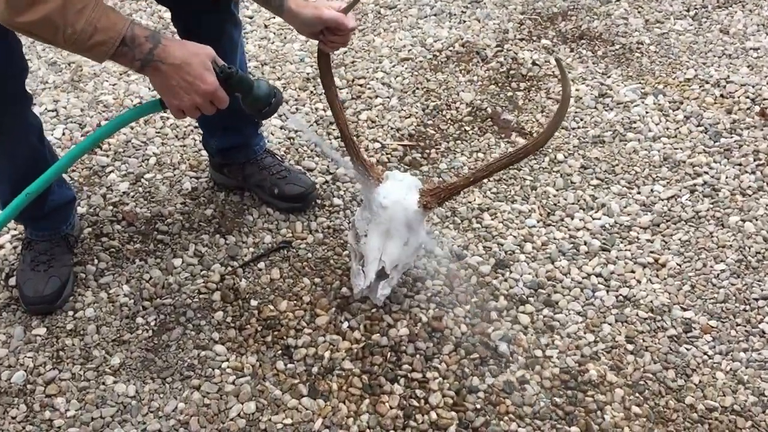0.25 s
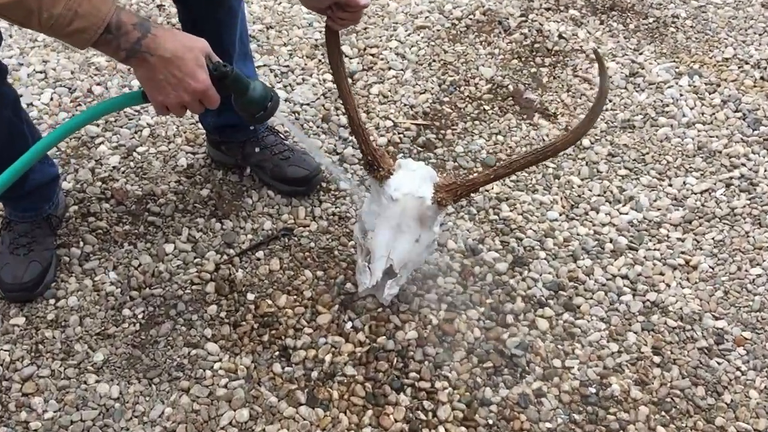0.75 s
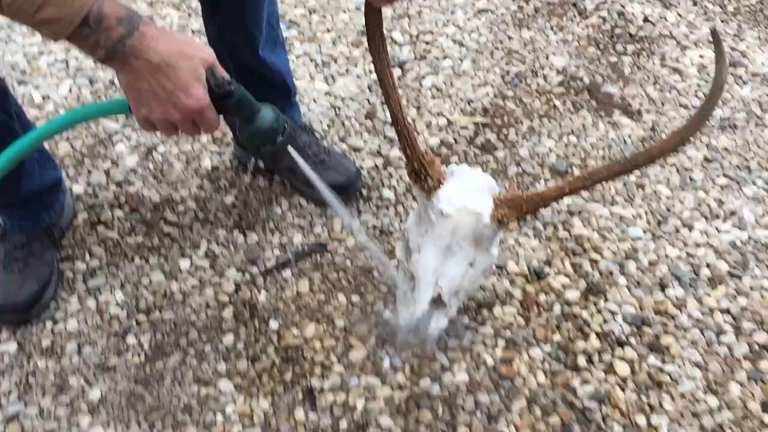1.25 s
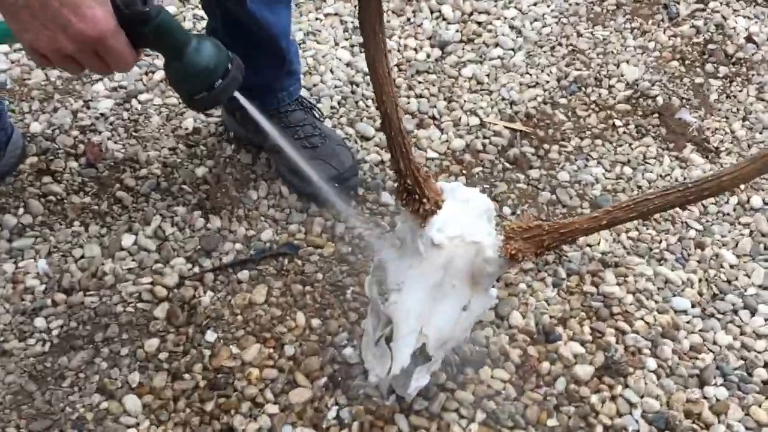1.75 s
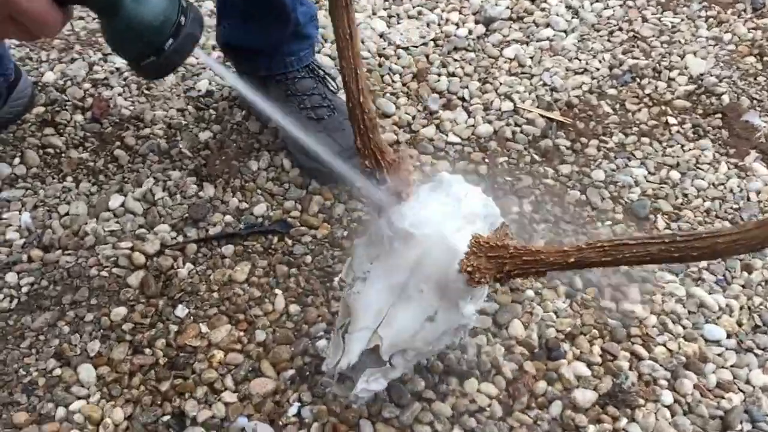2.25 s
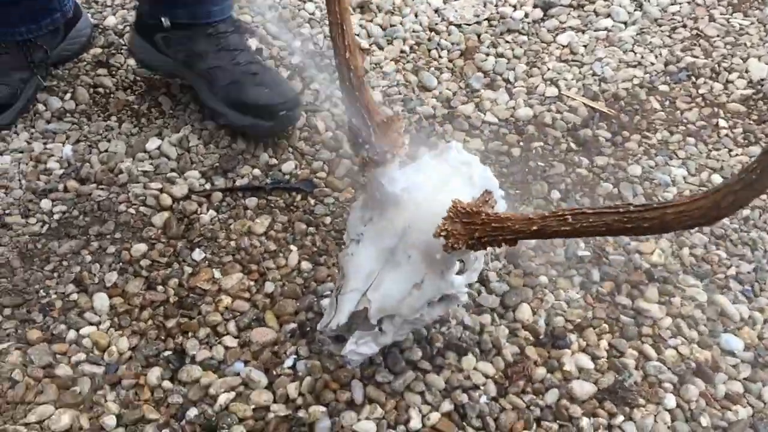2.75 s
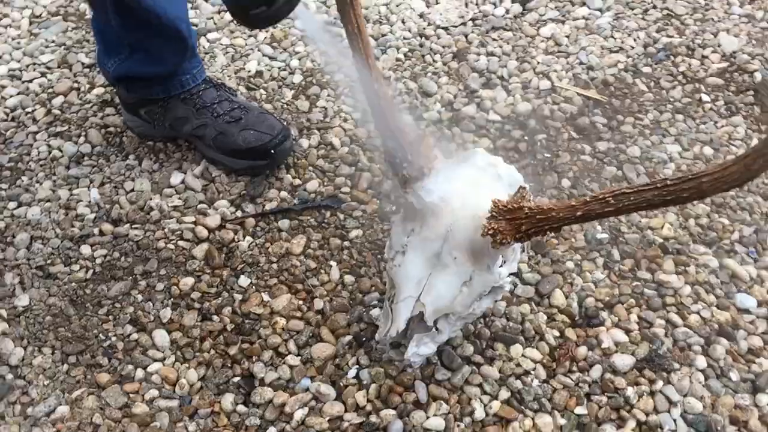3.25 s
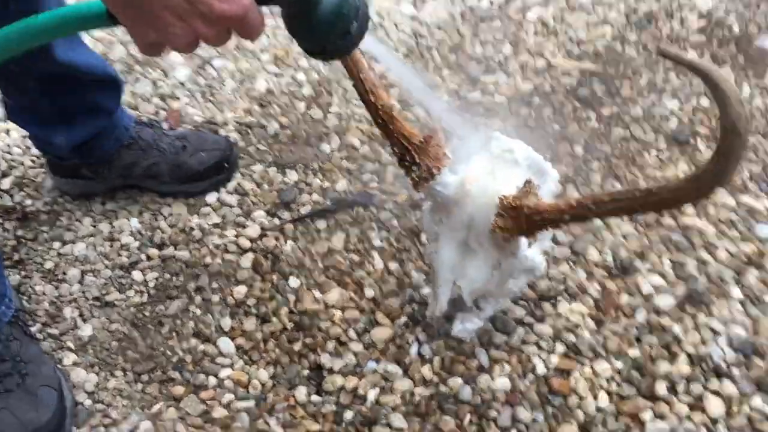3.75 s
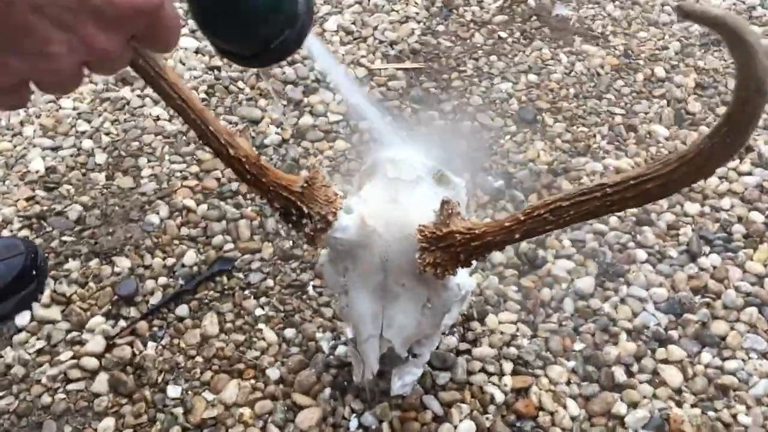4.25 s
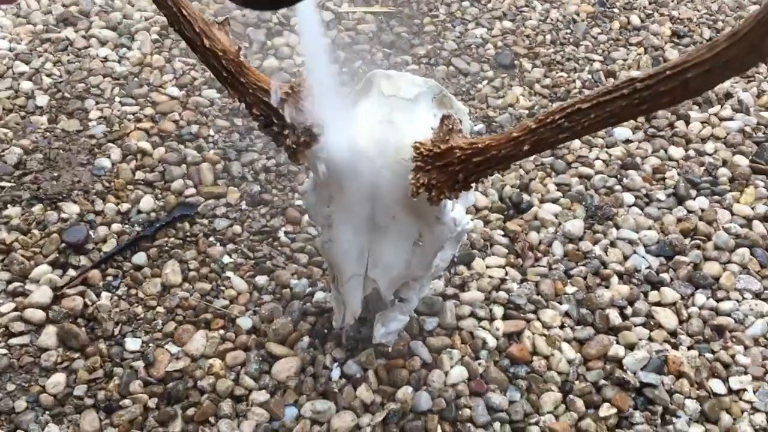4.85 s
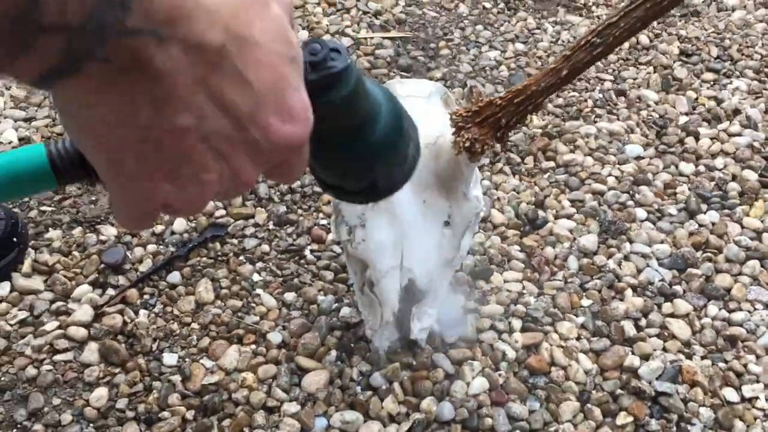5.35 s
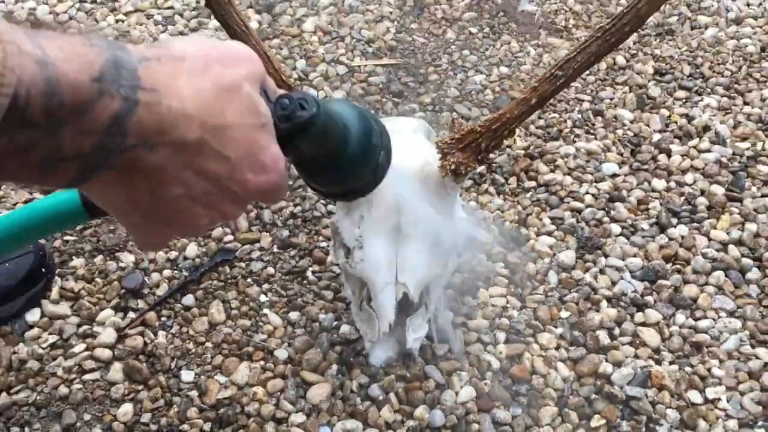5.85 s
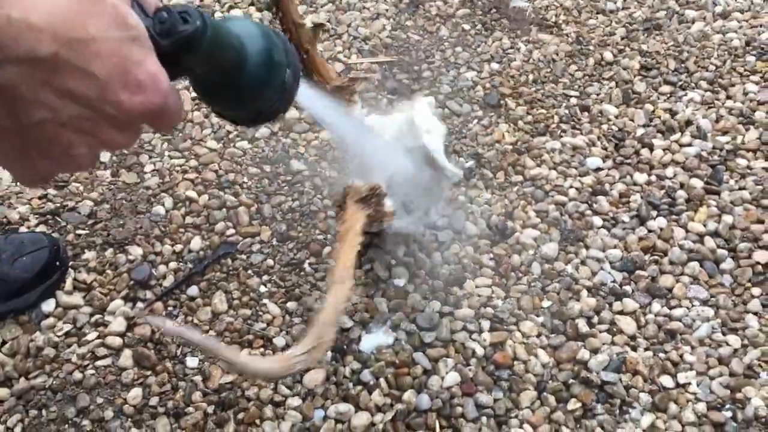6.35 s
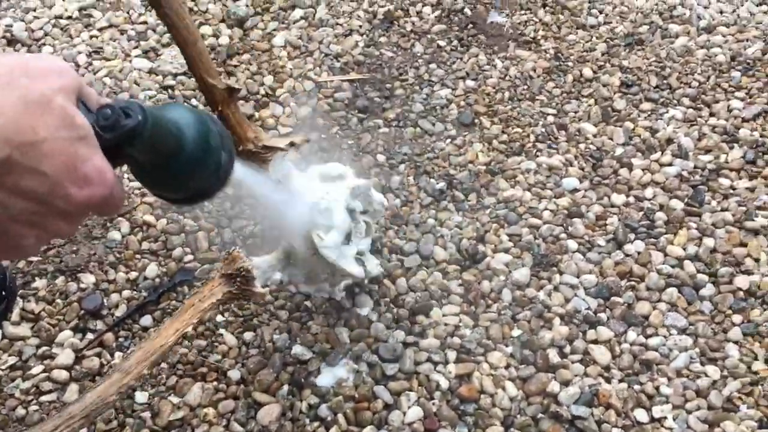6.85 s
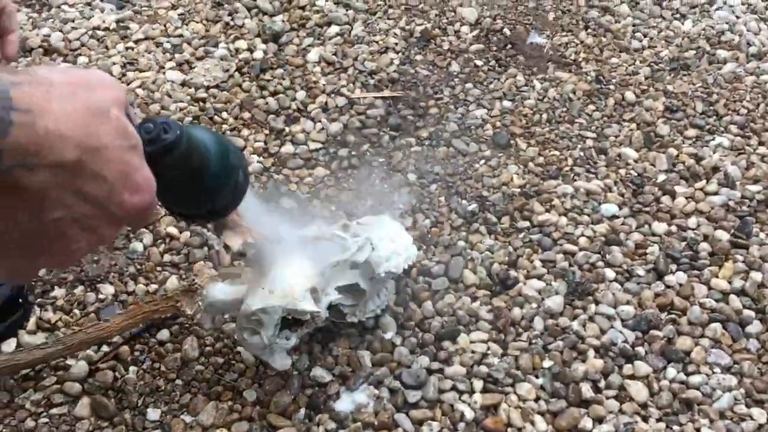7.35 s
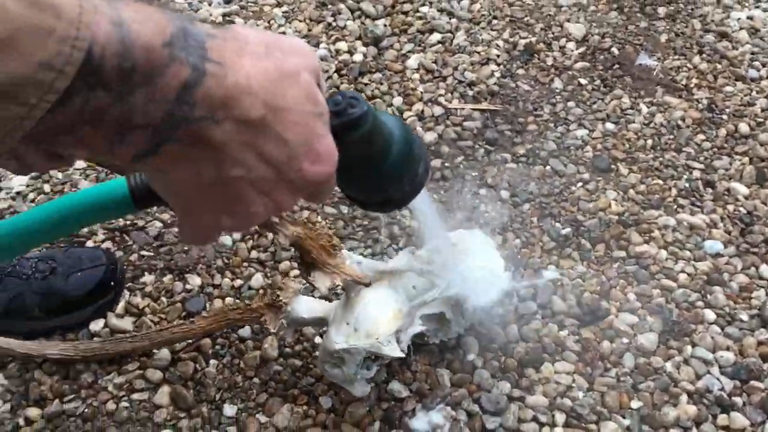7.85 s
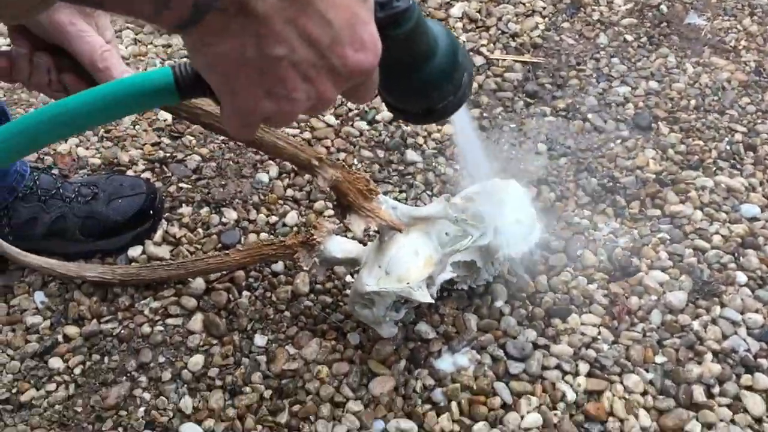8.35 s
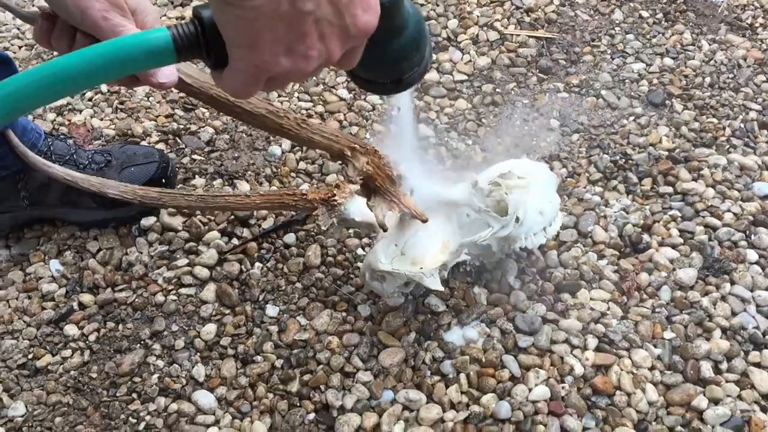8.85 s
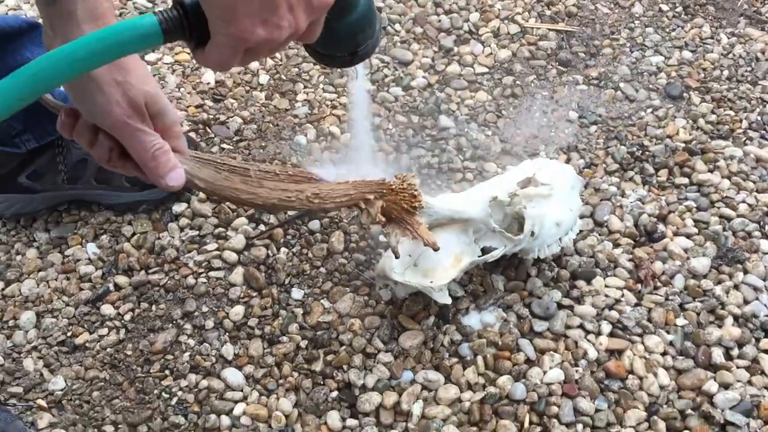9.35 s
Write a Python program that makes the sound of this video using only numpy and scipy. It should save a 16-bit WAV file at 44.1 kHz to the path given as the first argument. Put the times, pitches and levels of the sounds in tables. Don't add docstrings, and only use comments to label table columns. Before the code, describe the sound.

A steady, bright water spray wavers on stones and hollow bone. It starts moderate, with gulping spurts and dull knocks, swells into a series of harsh, ringing, comb-coloured roars, then drops back to close fine hiss and wet sputter. Wind buffets the small nearby microphone, most strongly past the middle. A faint engine rises briefly early on behind a dull traffic wash in an open gravel yard.

```python
import sys
import numpy as np
from scipy import signal
from scipy.fft import rfft, irfft
from scipy.io import wavfile

SR = 44100
rng = np.random.default_rng(int(sys.argv[2]) if len(sys.argv) > 2 else 0)


def elevation(decibels):
    levels = np.asarray(decibels, float)
    return 10 ** (levels / 20)


def generate_wav(signal):
    frames = np.transpose(np.atleast_2d(signal))
    scaled = np.clip(frames, -1, 1) * 32767
    pcm = np.round(scaled).astype(np.int16)
    wavfile.write(sys.argv[1], SR, pcm)


N = 423360
LIFTED_S = 3.9


def rms_one(x):
    return x / np.sqrt(np.mean(x ** 2) + 1e-20)


def in_time(rows, start=0, stop=N):
    s, *columns = np.transpose(rows)
    return [np.interp(np.arange(start, stop) / SR, s, c) for c in columns]


def curve(rows, start=0, stop=N):
    return in_time(rows, start, stop)[0]


def coloured(x, points):
    hz, db = np.transpose(points)
    grid = np.fft.rfftfreq(len(x), 1 / SR) + 1
    gain = elevation(np.interp(np.log(grid), np.log(hz), db))
    return rms_one(irfft(rfft(x) * gain, len(x)))


def cut(x, hz, kind, order=4):
    return signal.sosfilt(signal.butter(order, hz, kind, fs=SR, output="sos"), x)


def resonance(x, hz, width_hz):
    r = np.exp(-np.pi * width_hz / SR)
    poles = [1, -2 * r * np.cos(2 * np.pi * hz / SR), r * r]
    return signal.lfilter(np.array([1, 0, -1]) * (1 - r * r) / 2, poles, x)


def drift(rate):
    r = np.exp(-80 * np.pi * rate / SR)
    slow = signal.lfilter([1], [1, -2 * r, r * r], rng.standard_normal(N // 40 + 2002))[2000:]
    return np.interp(np.arange(N) / 40, np.arange(len(slow)), rms_one(slow))


def droplets(per_s, spread_db, burst_ms, share):
    struck = rng.random(N) < per_s / SR
    sizes = elevation(spread_db * np.minimum(rng.exponential(1, N), 2.1)) * struck
    bursts = signal.lfilter([1], [1, -np.exp(-1000 / (burst_ms * SR))], sizes)
    return rms_one(rng.standard_normal(N) + share * rms_one(bursts * rng.standard_normal(N)))


def puffs(rows, gain_db, rise_s, width):
    out, t = np.zeros(N + SR), np.arange(SR // 40) / SR
    for (s, db, hz), noise in zip(rows, rng.standard_normal((len(rows), len(t)))):
        puff = noise * t * np.exp(-t / rise_s)
        for _ in range(2):
            puff = resonance(puff, hz, width * hz)
        a = int(s * SR)
        out[a:a + len(t)] += elevation(db + gain_db) * puff / np.abs(puff).max()
    return out[:N]


# pitch_hz, level_db [dB per Hz]
TRAFFIC_COLOUR = [(18, -40), (30, -0.5), (86, -1.5), (165, -1.5), (564, -10), (788, -7.5), (1010, -13),
                  (1220, -4.5), (1480, -19.5), (2000, -17), (2600, -3), (4400, -120)]
# start_s, level_db
TRAFFIC_SWELL = [(0, -3), (.55, 0.5), (1.2, 2), (6.8, 4), (7.7, 2), (9.6, 3.5)]


def traffic():
    level_db = -44.5 + curve(TRAFFIC_SWELL) + 2.5 * drift(1.9)
    return elevation(level_db) * coloured(rng.standard_normal(N), TRAFFIC_COLOUR)


# start_s, speed [turns per s], level_db
ENGINE_SPEED = [
    (1.75, 46, -72),
    (1.9, 46.5, -47),
    (2.3, 48.5, -46),
    (2.7, 51, -46),
    (2.85, 52, -72),
]
# order [cycles per turn], level_db
ENGINE_HARMONICS = [
    (3, 0),
    (4, -6),
]


def engine():
    turns, level_db = in_time(ENGINE_SPEED)
    angle = 2 * np.pi * np.cumsum(turns) / SR
    tones = sum(elevation(db) * np.sin(order * angle) for order, db in ENGINE_HARMONICS)
    return elevation(level_db + 1.4 * drift(3.9)) * tones


# start_s, level_db
WIND_LEVEL = [(0, -45), (.64, -55), (.91, -66), (1.6, -46), (2.03, -65), (3.13, -63), (3.9, -51),
              (4.44, -54), (5.2, -50), (5.9, -43.5), (6.36, -32), (6.6, -48), (7.3, -50), (7.5, -40),
              (8.4, -51), (9.2, -46), (9.6, -50)]
# start_s, level_db [peak], pitch_hz
PORT_BUFFETS = [(0.033, -36, 124), (0.393, -32, 102), (0.946, -26, 87.5), (0.996, -23, 111),
                (1.062, -30, 80), (1.307, -29, 80.7), (1.37, -34, 109), (3.858, -29, 88.8),
                (5.707, -35, 72.7), (5.939, -19, 71), (6.052, -22, 77), (6.111, -27, 104),
                (6.178, -18, 107), (6.298, -22, 105), (6.348, -22, 72), (6.411, -22, 80.5),
                (6.482, -22.5, 107), (6.571, -24.5, 65), (6.839, -18.5, 63), (6.929, -28, 103),
                (7.057, -24, 96), (7.199, -25, 80.7), (7.289, -31, 59.5), (7.437, -32, 83.4),
                (7.54, -27, 119), (7.656, -17, 98), (7.814, -29, 75.4), (8.138, -29, 111), (8.598, -29, 76),
                (8.704, -27, 75.4)]


def wind():
    rumble = rms_one(cut(rng.standard_normal(N), [50, 140], "band", order=2))
    rumble *= elevation(curve(WIND_LEVEL) - 0.5 + 0.97 * drift(17.0))
    t = np.arange(SR // 8) / SR
    crack_hz, crack_s = 300, 0.0028
    for s, db, hz in PORT_BUFFETS:
        thump = np.sin(2 * np.pi * hz * (t - 2.0 * t ** 2)) * t / 0.0087 * np.exp(1 - t / 0.011)
        slap = elevation(-6) * np.sin(2 * np.pi * 210 * (t - 7.4 * t ** 2)) * t / 0.006 * np.exp(1 - t / 0.0077)
        crack = elevation(-19) * np.sin(2 * np.pi * crack_hz * t) * t / crack_s * np.exp(1 - t / crack_s)
        a = int(s * SR)
        rumble[a:a + len(t)] += elevation(db - 6.0) * (thump + slap + crack)[:N - a]
    return rumble


# start_s, level_db
CASE_TONE = [(0, -68), (2.1, -51), (2.3, -51), (2.7, -41), (3.6, -51), (3.85, -43), (4, -63), (4.3, -42),
             (4.5, -40), (4.7, -58), (4.9, -66), (9.6, -68)]


def singing():
    hz, width_hz = 1126, 110
    tone = resonance(resonance(rng.standard_normal(N), hz, width_hz), hz, 2 * width_hz)
    return elevation(curve(CASE_TONE)) * rms_one(tone)


# start_s, level_db [peak], pitch_hz
ROCKING = [(.951, -32, 260), (1.007, -36, 270), (1.327, -30, 300), (1.368, -29, 300), (1.396, -19, 300),
           (1.398, -33, 600), (1.712, -30, 280), (2.815, -24, 300), (3.865, -27.5, 334), (5.948, -28, 210),
           (6.84, -29, 230)]


def knocks():
    return puffs(ROCKING, gain_db=0, rise_s=0.0029, width=0.6)


# start_s, level_db [peak], pitch_hz
BIG_DROPS = [(1.2037, -9, 7550), (1.6018, -19, 5510), (1.8886, -13, 8260), (1.9485, -12, 5240),
             (2.3361, -6, 8340), (2.4544, -20, 7990), (2.4728, -13, 6500), (2.9811, -11, 5810),
             (4.4544, -10, 6550), (4.5236, -4, 3700), (4.8189, -16, 7830), (4.8319, -13, 7060),
             (6.155, -13, 6320), (6.4647, -11, 8020), (6.4752, -7, 8070), (6.9157, -11, 8170),
             (7.004, -10, 8420), (7.0204, -2, 8200), (7.0653, -12, 6330), (7.6395, -15, 4270),
             (7.8654, -8, 3990), (8.1748, -16, 7820), (8.373, -9, 5950), (9.05, -17, 4200),
             (9.2873, -22, 4300), (9.323, -14, 4220), (9.3666, -13, 8440)]


def smacks():
    return puffs(BIG_DROPS, gain_db=1.5, rise_s=0.00058, width=0.66)


# start_s, level_db [peak]
TINY_DROPS = [(2.4544, -14), (2.5494, -14), (2.564, -10), (2.6818, -10), (7.3088, -2), (7.6595, -9),
              (7.7244, -14), (8.9116, -5), (8.976, -4), (9.0389, -11), (9.3666, -13), (9.3804, -6),
              (9.4014, -10), (9.43, -6), (9.4454, -7), (9.523, -5)]


def ticks():
    rows = [(s, db, 10500) for s, db in TINY_DROPS]
    return puffs(rows, gain_db=1, rise_s=0.00033, width=1)


# start_s, level_db [peak], pitch_hz
HOLLOW_GULPS = [(0.686, -21, 1930), (0.799, -18, 1860), (0.85, -16, 1710), (0.927, -27, 1890),
                (0.962, -26, 2220), (0.982, -25, 1860), (1.064, -16, 1790), (1.098, -24, 2030),
                (1.136, -24, 1260), (1.202, -18, 3000), (1.202, -9, 1680), (1.305, -14.5, 1480),
                (1.335, -16, 1310), (1.543, -19, 1530),
                (5.1572, -18, 2250), (5.2535, -23, 2230), (5.2869, -13, 2230), (5.3285, -12, 2410),
                 (5.3488, -9, 2520), (5.4016, -22, 2220), (5.4478, -13, 1270), (5.5153, -15, 1380),
                 (5.5414, -15, 1310), (5.6498, -12, 1290),
                (7.734, -10, 2060), (7.828, -9, 3750), (8.0445, -17, 2590), (8.1288, -24, 2650),
                    (8.3443, -17, 2200), (8.3738, -22, 2480), (8.427, -14, 2190), (8.585, -20, 2300),
                    (8.594, -16, 2520), (8.6566, -28, 3830)]


def gulps():
    rows = HOLLOW_GULPS
    return puffs(rows, gain_db=-4.5, rise_s=0.0018, width=0.27)


def hollow(gush, hz):
    width_hz = 0.24 * hz
    core = rms_one(resonance(resonance(gush, hz, width_hz), hz, width_hz))
    skirts = rms_one(cut(resonance(gush, hz, 2 * width_hz), hz / 2, "high", order=2))
    return rms_one(core + elevation(-3) * skirts)


# start_s, length_s, level_db, pitch_hz,
# neighbour_hz
HOLLOW_SPURTS = [(.01, 0.28, -41.5, 2460, 1800), (0.753, 0.11, -37, 1840, 1140),
                 (0.962, 0.067, -30, 1880, 1170), (1.052, 0.089, -35, 2000, 2490),
                 (1.119, 0.11, -31, 1310, 1890), (1.3, 0.14, -33.5, 1280, 2310),
                 (1.38, 0.0047, -32, 930, 506), (1.416, 0.074, -33.5, 1770, 2570),
                 (1.5, .065, -35.5, 1440, 2000), (2.283, 0.0089, -33, 1140, 1800),
                 (2.287, 0.006, -39, 470, 300), (3.83, 0.022, -41.5, 355, 1300),
                 (5.134, 0.083, -31.5, 2520, 1260), (5.255, 0.03, -33, 2330, 1900),
                 (5.274, 0.008, -33, 1300, 2250), (5.31, 0.049, -34, 1230, 2490),
                 (5.428, 0.025, -29, 1300, 1810), (5.466, 0.028, -34, 1310, 2300),
                 (5.504, 0.064, -26.5, 1960, 1100), (5.559, 0.11, -26.5, 1880, 1330),
                 (5.604, 0.059, -28, 1220, 1950), (5.654, 0.023, -42, 1760, 1250),
                 (6.315, 0.042, -40, 1080, 750), (6.84, 0.008, -44, 900, 450),
                 (7.596, 0.85, -47, 2400, 1910), (7.707, 0.046, -31.5, 2030, 2600),
                    (7.824, 0.046, -22.5, 3940, 3000), (7.828, 0.038, -24, 1950, 2600),
                    (7.869, 0.045, -31.5, 2180, 1400), (7.878, 0.05, -31, 3800, 2700),
                    (7.963, 0.1, -37, 2100, 2600), (8.16, 0.097, -36.5, 2480, 4000),
                    (8.315, 0.099, -33.5, 2350, 3900), (8.403, 0.056, -35, 2000, 4400),
                    (8.434, 0.083, -34, 2350, 4300), (8.564, 0.045, -33.5, 2420, 1750),
                    (9.03, 0.054, -36, 4200, 2980), (9.27, 0.07, -32.5, 4100, 2730)]


def spurts():
    out, glugs = np.zeros(N), droplets(per_s=81, spread_db=-2.0, burst_ms=0.38, share=0.71)
    for s, length, db, hz, neighbour_hz in HOLLOW_SPURTS:
        a, size = int((s - .006) * SR), int((length + 0.029) * SR)
        gush = glugs[a:a + size] * signal.windows.tukey(size, .7)
        out[a:a + size] += elevation(db) * (hollow(gush, hz) - elevation(-6.5) * hollow(gush, neighbour_hz))
    return out


# start_s [centre], level_db, half_length_s, hiss_share [ratio]
EDGE_CATCHES = [(0.08, 3, 0.021, 1.1), (0.385, 3, 0.037, 0.6), (0.536, 3, 0.034, 1), (1.6, 5.5, 0.0087, 1),
                (1.884, 5, 0.0061, 0.4), (1.41, 2.5, 0.041, 0.1), (2.194, 6, 0.015, 0.6),
                (2.42, 5.5, 0.032, 0), (2.483, 8, 0.016, 0), (3.797, 2.5, 0.042, 1), (3.912, 7, 0.02, 1),
                (4.84, 5.5, 0.034, .8), (5.41, 2, 0.056, 1.1), (6.48, 4, 0.018, 1), (6.913, 4.5, 0.011, 1),
                (7.028, 10, 0.018, 0.8), (7.072, 6.5, 0.023, 1), (7.303, 7, 0.031, 0.9),
                (7.396, 7.5, 0.012, 0), (7.467, 6.5, 0.023, 1), (8.188, 5.5, 0.02, 1),
                (8.378, 6, 0.037, 0.2), (8.599, 10, 0.017, 0), (8.753, 1.5, 0.031, 1), (8.912, 6, 0.017, 1),
                (9.052, 3, 0.015, 0.5), (9.307, 3.5, 0.13, 0)]
# start_s [centre], level_db, half_length_s
JET_LAPSES = [(0.485, -3.5, 0.034), (0.602, -4, 0.026), (1.47, -4, 0.023), (1.64, -4, 0.045),
              (3.268, -8, 0.032), (3.7, -8.5, 0.037), (3.895, -6, 0.077), (4.255, -4.5, 0.057),
              (4.775, -8, 0.034), (5.104, -3, 0.019), (5.304, -1, 0.05), (5.477, -4, 0.037),
              (6.696, -4, 0.0087), (6.885, -5, 0.011), (8.62, -6, 0.039), (8.824, -8.5, 0.044),
              (9.227, -10, 0.055)]


def wavering():
    t, level_db = np.arange(0, N, 40) / SR, 0
    lapses = [(s, db, half_s, 0.84) for s, db, half_s in JET_LAPSES]
    for s, change_db, half_s, hiss_share in EDGE_CATCHES + lapses:
        reach_s = half_s * np.where(t > s, 1.04, 1)
        bell = np.exp(-((t - s) / reach_s) ** 2)
        level_db = level_db + change_db * np.outer([1, hiss_share], bell)
    return [np.interp(np.arange(N) / SR, t, row) for row in level_db]


def patchy(x):
    edges = np.geomspace(2800, 15500, num=8)
    out = x.copy()
    for low, high in zip(edges, edges[1:]):
        out += (elevation(1.2 * drift(3.5)) - 1) * resonance(x, np.sqrt(low * high), high - low)
    return out


# pitch_hz, level_db [dB per Hz]
NEAR_MIST_COLOUR = [(1650, -25), (2800, -4.5), (4210, 2.5), (5230, 1), (5730, -1), (6190, 0.5),
                    (8920, -1.5), (10200, 3), (12200, 1.5), (15000, -1)]
# pitch_hz, level_db [dB per Hz]
FAR_MIST_COLOUR = [(1650, -48), (2800, -25), (3750, -21), (4800, -0.5), (6240, 0), (7970, -2.5),
                   (9640, -4.5), (15000, 3.5)]
# start_s, closeness [0 far to 1 near]
SPRAY_CLOSENESS = [(0, 0.48), (1.2, 0.066), (4.0, 0.66), (4.8, 1), (9.6, 0.98)]


def mist(stream):
    near = np.clip(curve(SPRAY_CLOSENESS), 0, 1)
    return near * coloured(stream, NEAR_MIST_COLOUR[:-1]) + (1 - near) * coloured(stream, FAR_MIST_COLOUR)


# start_s, level_db
SPRAY_FINENESS = [(0, 0), (5.2, 0), (6.1, 1.5), (6.8, -1.5), (7.3, -0.5), (7.6, 1), (8.7, 2), (9.2, 2),
                  (9.6, 3)]


def fine_hiss(drops, fine_db):
    hiss = rms_one(cut(drops, 8500, "high")) * elevation(fine_db + 1.55 * drift(17))
    return hiss + (elevation(curve(SPRAY_FINENESS)) - 1) * cut(hiss, 9100, "high")


def stone_spatter(drops, bone_db, aim_db):
    spatter = rms_one(cut(drops, 8500, "low")) * elevation(-2 + 0.53 * bone_db + aim_db + 0.92 * drift(30))
    shaded_until_s, shade_hz = 1.45, 4900
    shade = 0.51 * np.clip(2 * (shaded_until_s - np.arange(N) / SR), 0, 1)
    return spatter - shade * resonance(spatter, shade_hz, shade_hz / 4)


# pitch_hz, level_db [dB per Hz]
WASH_COLOUR = [(350, -11), (600, -9.5), (798, -2.5), (863, -2), (1050, -2.5), (1320, -1), (2180, 3),
               (3300, -4.5), (4290, -7.5), (7260, -120)]
# start_s, level_db
HOLLOW_DEPTH = [(0, -25), (.6, 1.5), (1, 1), (1.4, 5.5), (2, 2.5), (2.9, -10), (3.6, 8.5), (3.9, 4.5),
                (4.4, 1.5), (5.2, -3.5), (5.7, 0.5), (6.3, 1), (6.9, 2.5), (7.7, -2), (8, -14), (8.3, 2),
                (8.9, 1), (9.6, 0)]


def bone_wash(stream, bone_db, aim_db, fine_db):
    wash = coloured(stream + 1.2 * rng.standard_normal(N), WASH_COLOUR)
    wash += (elevation(curve(HOLLOW_DEPTH)) - 1) * cut(wash, 1760, "low", order=2)
    level_db = bone_db + 0.62 * aim_db - 0.23 * np.maximum(fine_db, 0) + 1.2 * drift(16)
    return wash * elevation(level_db)


# start_s, level_db
JET_FLOW = [(0, -29), (.9, -25), (1.55, -26), (2.02, -24.5), (2.45, -22), (3.6, -21.5), (4.25, -23),
            (4.9, -20), (5.25, -24), (5.6, -20.5), (6.1, -22), (6.7, -24.5), (7.2, -28), (7.6, -24.5),
            (8.1, -26), (8.7, -24), (9.4, -21.5), (9.6, -21)]
# start_s, level_db
BONE_SHARE = [(0, -8.5), (.65, -10), (.85, -11), (1.4, -3.5), (1.6, -8), (2.1, -11), (2.7, -12), (3.7, -12),
              (4.3, -10), (4.95, -16), (5.2, -10.5), (5.66, -10.5), (5.72, -17.5), (7.65, -11), (7.75, -6),
              (8.5, -14), (8.7, -13.5), (9.6, -18.5)]


def spray():
    bone_db = curve(BONE_SHARE)
    aim_db, fine_db = wavering()
    surge_db = 0.42 * drift(39) + 0.05 * drift(51)
    stream = droplets(per_s=600, spread_db=6.5, burst_ms=0.26, share=0.76)
    drops = mist(stream)
    on_stone = patchy(fine_hiss(drops, fine_db) + stone_spatter(drops, bone_db, aim_db))
    wash = bone_wash(stream, bone_db, aim_db, fine_db)
    return elevation(curve(JET_FLOW) + surge_db) * (on_stone + wash)


def echoed(roar, path, scatter, low_antler):
    ground_ms, ground, bone_ms, bone = path
    taps = np.zeros(320)
    places = np.linspace(40, 310, len(scatter)).astype(int) + (20 * scatter).astype(int)
    taps[places] = scatter
    taps[[0, round(ground_ms * SR / 1000), round(bone_ms * SR / 1000)]] = 1, ground, -bone
    taps[round(2.42 * SR / 1000)] += 0.22 * low_antler
    return signal.lfilter(taps, [1], roar)[320:]


# pitch_hz, width_hz, level_db
DEEP_MODES = [
    (750, 160, -4),
    (1100, 58, 0),
    (1400, 55, -10),
]
# pitch_hz, width_hz, level_db
LOW_MODES = [(1840, 380, 1.5), (2130, 62, -3.5), (2520, 41, -7), (2880, 150, -2.5), (3340, 84, -8.5),
             (3610, 72, -4), (4780, 180, -3), (5260, 130, 0.5), (5940, 280, 0), (6180, 60, -3),
             (6500, 170, -1), (7300, 140, -10), (7900, 170, 2), (8500, 54, -9)]
# pitch_hz, width_hz, level_db
LIFTED_MODES = [(1170, 35, -19), (1840, 90, -5), (2200, 110, -8), (2800, 68, -7), (3400, 56, 6),
                (3980, 110, -1), (4970, 62, -9), (5420, 130, 2), (6300, 96, -2), (8200, 120, -4),
                (7490, 44, -5), (7700, 90, 1), (10500, 150, -3), (11260, 110, -3)]


def rung(heard, ring, seat, low_antler):
    low_hz, high_hz, high_db, _, top_db = ring
    low_db, body_db, antler_db = seat
    heard = heard + (elevation(low_db) - 1) * resonance(heard, low_hz, 0.6 * low_hz)
    heard += (elevation(high_db) - 1) * resonance(heard, high_hz, 0.15 * high_hz)
    heard -= 0.12 * resonance(heard, 0.95 * high_hz, 0.11 * high_hz)
    heard += (elevation(1.5) - 1) * resonance(heard, 8430, 900)
    heard += (elevation(top_db) - 1) * cut(heard, 11100, "high", order=1)
    heard += (elevation(body_db) - 1) * cut(heard, 2300, "low", order=2)
    heard += sum(elevation(db - 3) * resonance(heard, hz, 1.5 * width_hz) for hz, width_hz, db in DEEP_MODES)
    modes, modes_db = (LOW_MODES, 0.5) if low_antler else (LIFTED_MODES, 5)
    modes_db += antler_db
    return heard + sum(elevation(modes_db + db) * resonance(heard, hz, 1.9 * width_hz) for hz, width_hz, db in modes)


def drummed(thud, drum_hz, strike_db):
    drum = thud + 8.2 * resonance(thud, drum_hz, 0.33 * drum_hz)
    level_db = -27.5 + 0.84 * (strike_db + 12.5) + 4 * np.log2(300 / drum_hz)
    return rms_one(drum) * elevation(level_db)


# start_s, level_db, rise_s, hold_s, fall_s
ANTLER_STRIKES = [(1.19, -17, 0.016, 0.037, 0.047), (1.685, -10.5, 0.049, 0.036, 0.12),
                  (1.911, -15, 0.052, 0.0086, 0.021), (2.32, -13, 0.019, 0.012, .06),
                  (2.733, -10, 0.005, 0.11, 0.13), (2.971, -13.5, 0.0089, 0.1, 0.16),
                  (3.116, -15.5, 0.034, 0.074, 0.14), (3.301, -12.5, 0.025, 0.06, 0.14),
                  (3.475, -17.5, 0.0087, 0.072, 0.15), (4.009, -16.5, 0.023, 0.016, 0.14),
                  (4.306, -14.5, 0.028, 0.016, 0.046), (4.501, -10, 0.029, 0.037, 0.035),
                  (4.569, -11, 0.039, 0.019, 0.086)]
# ground_ms, ground_gain [ratio], bone_ms [inverted echo], bone_gain [ratio]
ECHO_PATHS = [(1.15, 0.16, 2.1, 0.17), (2.05, 0.45, 2.16, 0.3), (2.09, 0.5, 2.18, 0.45),
              (2.18, 0.35, 0.91, 0.15), (2.77, 0.3, 2.2, 0.22), (2.72, 0.3, 2.2, 0.25),
              (2.81, 0.33, 2.52, 0.25), (2.79, 0.3, 2.52, 0.3), (2.79, 0.28, 2.52, 0.15),
              (2.77, 0.22, 1.04, 0.2), (2.52, 0.2, 2.11, 0.22), (2.29, 0.38, 2.4, 0.2),
              (2.24, 0.25, 2.36, 0.28)]
# low_hz, middle_hz, middle_db, drum_hz, top_db [above 11.1 kHz]
SPOT_RINGS = [(2420, 3040, 10, 600, 0), (2100, 4900, 1, 210, 2), (2100, 5000, -1, 300, 8.5),
              (2000, 5600, 3, 310, 3), (2600, 5000, 6.5, 260, -19), (2100, 5400, 5.5, 390, -13),
              (2100, 4800, 7, 260, -13), (2100, 4800, 8.5, 125, -19), (2060, 4800, 8.5, 370, 5),
              (2100, 2900, 2, 185, 3), (2100, 3600, 7, 380, 4.5), (3430, 3750, 6, 137, -13),
              (3780, 4800, 1, 108, -14)]
# low_ring_db, body_db [below 2.3 kHz], antler_db
STRIKE_SEATING = [(0, -6, -1), (3, 1, 2.5), (8, -4, -2), (2, -7, 0), (2.5, -3, -5.5), (0, -5.5, -5),
                  (0.5, -4.5, -3), (1.5, 0.5, -0.5), (4, -3, 6), (6, -6, -4), (5, -6, -11), (0, -3, -4),
                  (7.5, 2, 1)]
# pitch_hz, level_db [dB per Hz]
ROAR_COLOUR = [(290, -19.5), (500, -7.5), (1280, -6), (1800, -6.5), (4350, -8.5), (5230, -7), (7160, -9),
               (8020, -6), (15000, -15.5)]


def strikes():
    out, stream = np.zeros(N), droplets(per_s=720, spread_db=6.5, burst_ms=0.26, share=0.67)
    roar = coloured(stream, ROAR_COLOUR[:-1])
    thud = rms_one(cut(stream, [110, 700], "band", order=2))
    scatters = rng.standard_normal((len(ECHO_PATHS), 14)) * 0.062
    for strike, path, ring, seat, scatter in zip(ANTLER_STRIKES, ECHO_PATHS, SPOT_RINGS, STRIKE_SEATING, scatters):
        s, db, rise, hold, fall = strike
        held_s, held_db = s + rise + hold, db - 30 * hold
        envelope = [(s, db - 16), (s + 0.25 * rise, db - 3.5), (s + rise, db),
                    (held_s, held_db), (held_s + fall, held_db - 20.5)]
        a, b = int(s * SR), int((held_s + fall) * SR)
        low_antler = s < LIFTED_S
        heard = rung(echoed(roar[a - 320:b], path, scatter, low_antler), ring, seat, low_antler)
        drum = drummed(thud[a:b], ring[3], db)
        fade = signal.windows.tukey(b - a, 160 / (b - a))
        out[a:b] += fade * elevation(curve(envelope, a, b)) * (rms_one(heard) + drum)
    return out * elevation(1.1 * drift(35))


def scene():
    background = traffic() + engine() + wind()
    impacts = knocks() + smacks() + ticks()
    hollows = singing() + gulps() + spurts()
    return (background + impacts + hollows + spray() + strikes())[None]


def band_limit(x):
    return signal.sosfilt(signal.butter(12, 17090, fs=SR, output="sos"), x)


# pitch_hz, width_hz, depth [0-1]
PORT_DIPS = [
    (5830, 100, 0.4),
    (9220, 570, 0.24),
    (12100, 240, 0.6),
]


def record(dry):
    heard = cut(cut(dry[0], 48.5, "high"), 36, "high", order=2)
    for hz, width_hz, depth in PORT_DIPS:
        heard = heard - depth * resonance(heard, hz, width_hz)
    rounded = .72 * np.tanh(heard / .72)
    top_cut = signal.ellip(14, .5, 90, 15730, fs=SR, output="sos")
    finished = signal.sosfilt(top_cut, rounded)[None]
    return band_limit(finished)


dry = scene()
out = record(dry)
generate_wav(out)
```